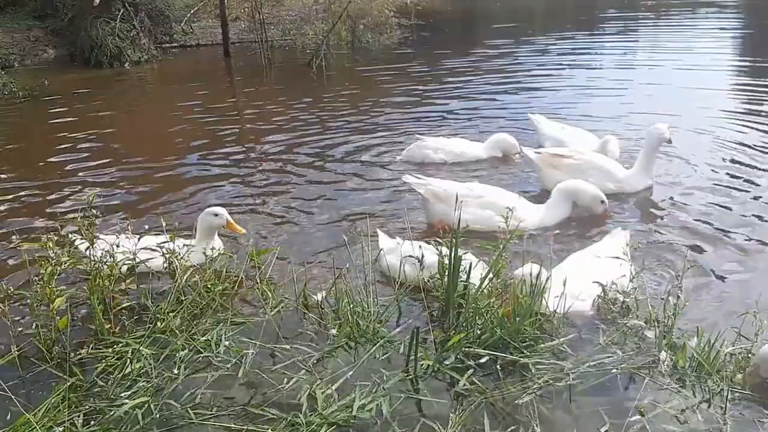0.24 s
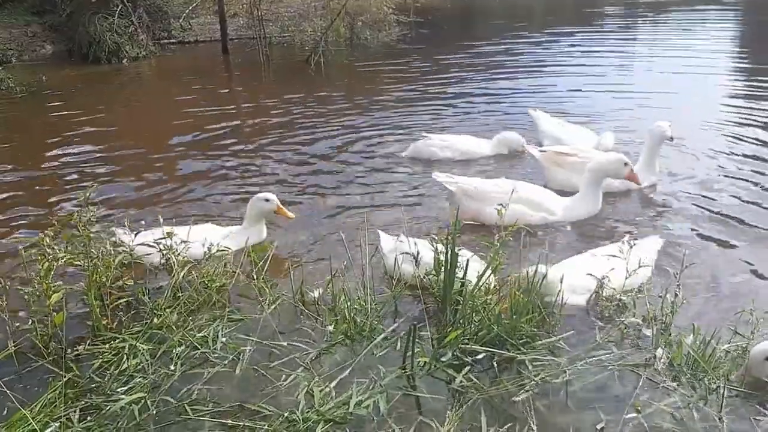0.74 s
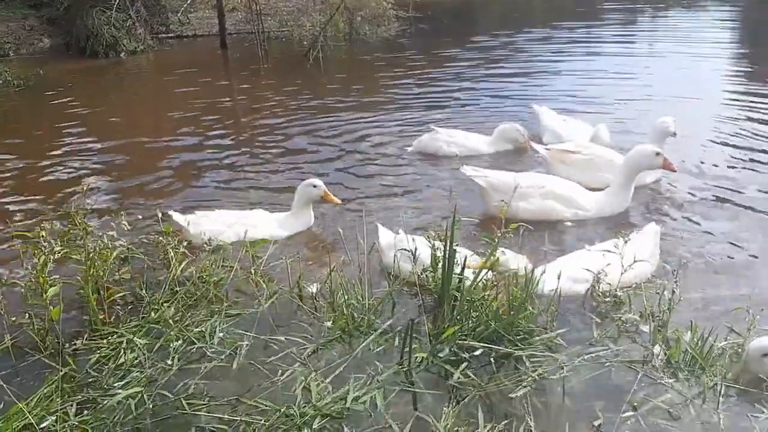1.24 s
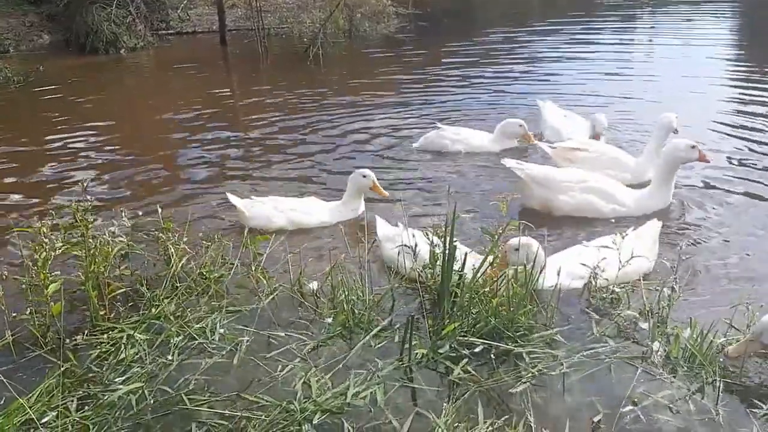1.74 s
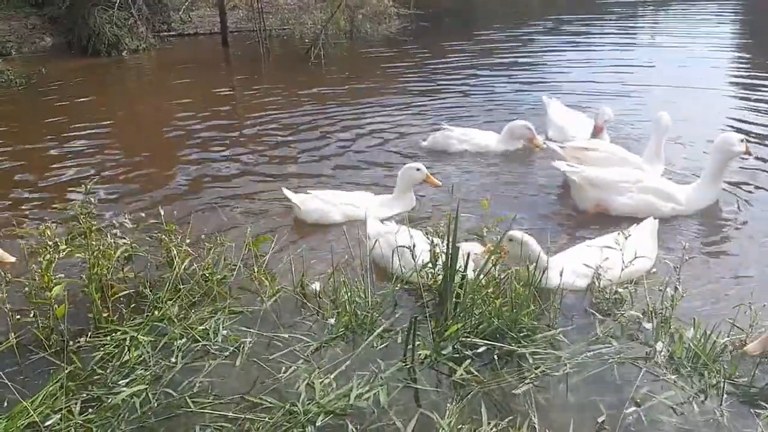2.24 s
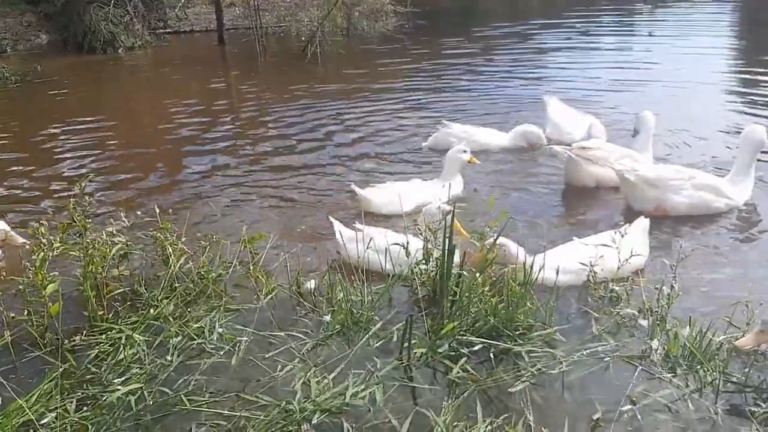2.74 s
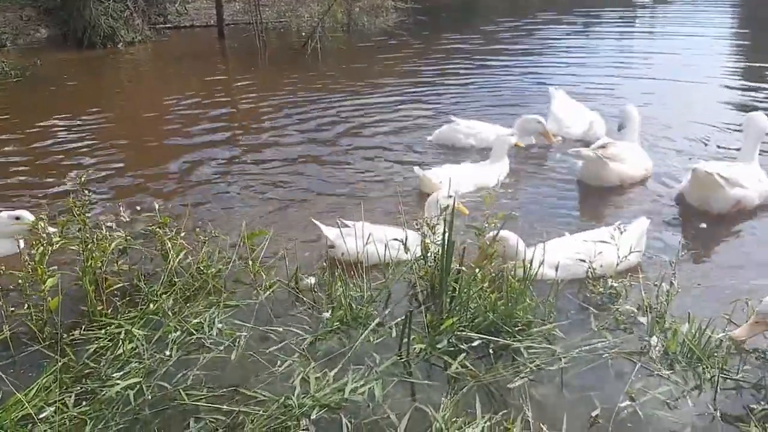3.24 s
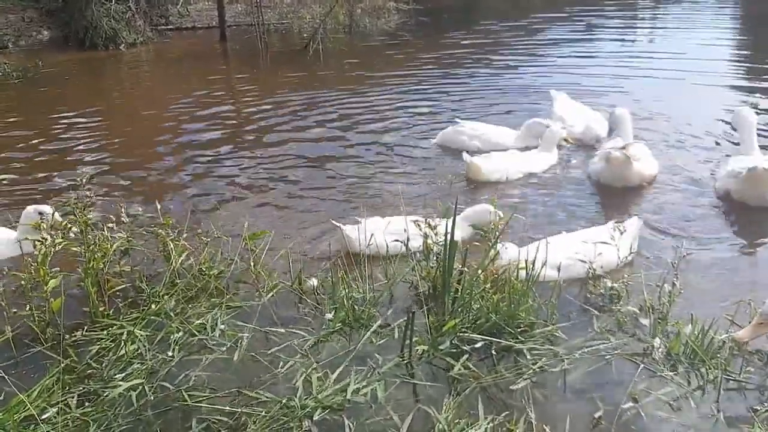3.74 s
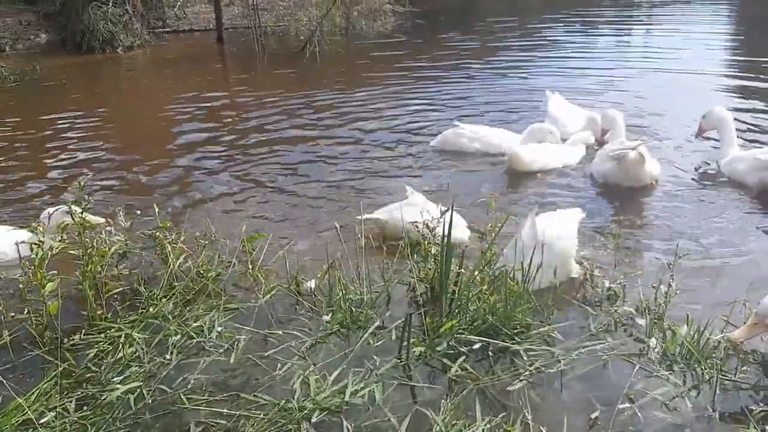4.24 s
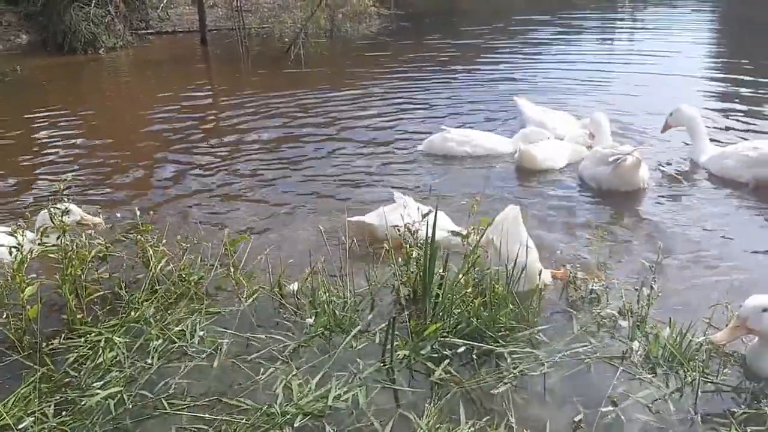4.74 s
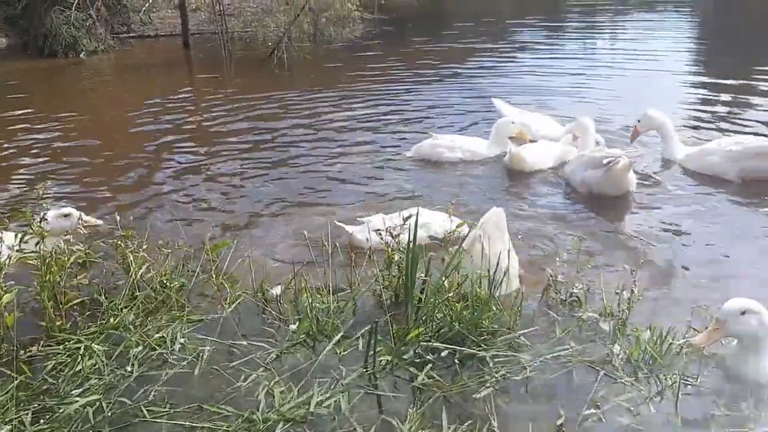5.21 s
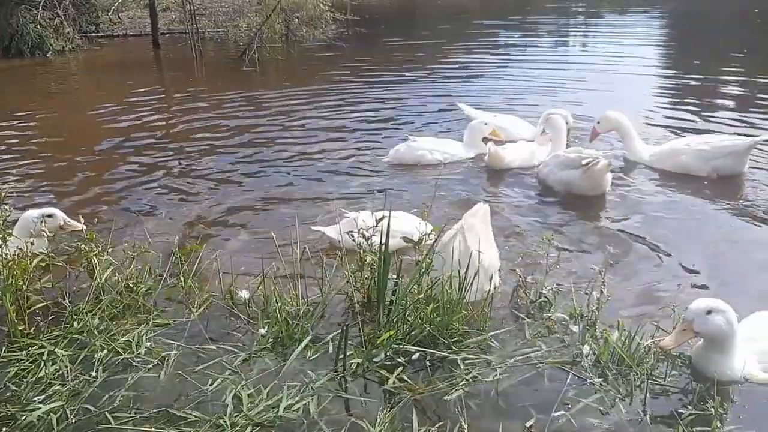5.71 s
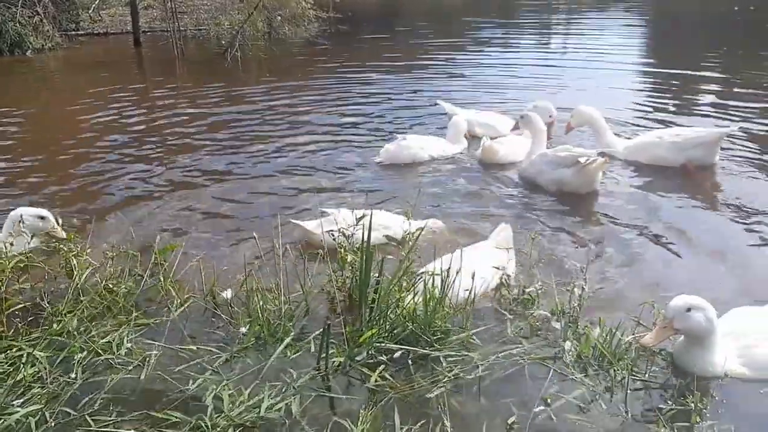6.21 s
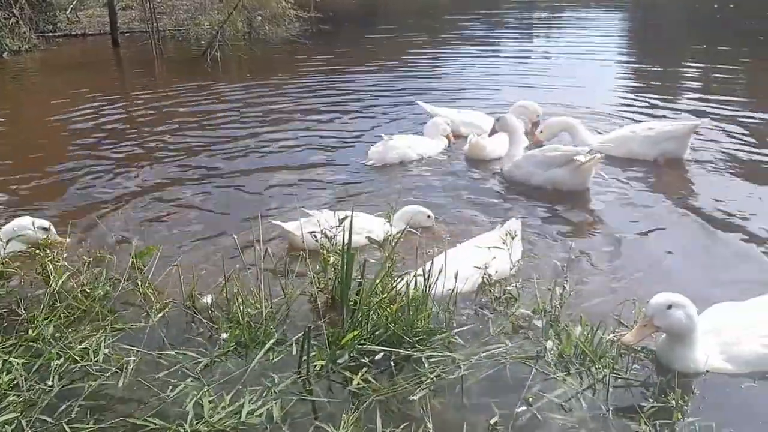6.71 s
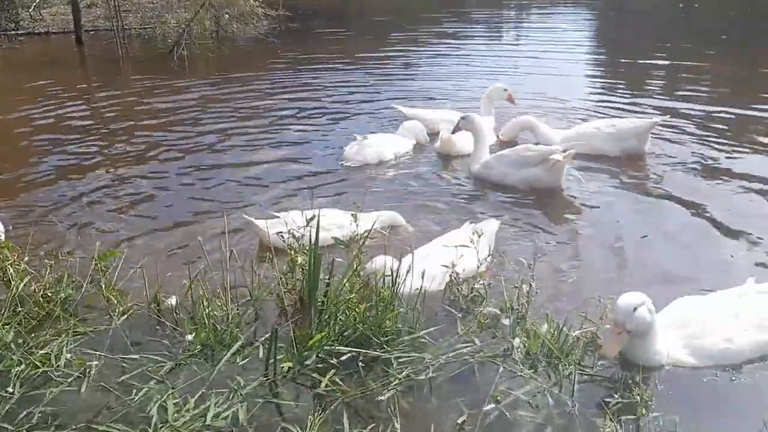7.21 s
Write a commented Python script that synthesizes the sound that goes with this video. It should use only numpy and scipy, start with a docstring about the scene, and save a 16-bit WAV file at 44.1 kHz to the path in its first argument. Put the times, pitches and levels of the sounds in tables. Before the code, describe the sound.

Several white ducks and geese feed a few metres away in a shallow pond. Gurgling water and sharp drips open with a quick goose honk, then calm. A busy burst of grunts, plops and splashing follows in the middle, then thin drips and soft duck rasps, then crisp splashes and bill clacks before it settles. Faint insects buzz throughout; small stereo outdoor microphone, little echo.

```python
"""Ducks and geese at a shallow pond

Ducks and geese dabble a few metres from a small camera with two microphone ports. Goose grunts are uneven
pulses; duck rasps and two watery splashes are chopped air, both through throat resonances. Peeps, plops and one
far whistle are gliding sines; drops ring briefly; spray is hiss with tiny bubbles. Insects buzz, trill and
chirp as throbbing narrow tones and noise, over a faint rumble of shaped noise."""
import sys
import numpy as np
from scipy import signal
from scipy.fft import rfft, irfft, next_fast_len
from scipy.io import wavfile
from scipy.ndimage import uniform_filter1d

SR = 44100
rng = np.random.default_rng(int(sys.argv[2]) if len(sys.argv) > 2 else 0)


def materialize(psi):
    """Save the field psi as 16-bit PCM at rate SR to the path in sys.argv[1].

    A 1-D psi becomes a single channel; in a 2-D psi each row is a channel.
    """
    bounded = np.clip(np.atleast_2d(psi).T, -1, 1)
    quanta = np.round(bounded * 32767).astype(np.int16)
    wavfile.write(sys.argv[1], SR, quanta)


N = 328986


def gain_of(db):
    """Amplitude factor of a level in dB."""
    return 10 ** (np.asarray(db) / 20)


def evened(x):
    """Scale to rms 1."""
    return x / np.sqrt(np.mean(x ** 2) + 1e-20)


def peaked(x, db):
    """Scale to a peak in dB."""
    return gain_of(db) * x / abs(x).max()


def read(points, hz):
    """Read a curve of (Hz, value) points along log frequency."""
    f, value = np.transpose(points)
    return np.interp(np.log(hz + 1), np.log(f + 1), value)


def over_time(points):
    """Read a curve of (seconds, value) points at every sample."""
    return np.interp(np.arange(N) / SR, *np.transpose(points))


def add(mix, s, sound):
    """Lay a sound into the mix at s seconds."""
    part = mix[..., round(s * SR):][..., :sound.shape[-1]]
    part += sound[..., :part.shape[-1]]


def ring(x, hz, width):
    """Two-pole resonance of gain 1."""
    return signal.lfilter(*signal.iirpeak(hz, hz / width, SR), x)


def throat(drive, resonances, level_db):
    """Parallel resonances, each a narrow and a wide one in a row; level_db(Hz) adds to their own levels."""
    out = 0
    for f, width, db in resonances:
        out = out + gain_of(db + level_db(f)) * ring(ring(drive, f, width), f, 3 * width)
    return out


def swell(length, peak):
    """Smooth rise to the given share of the length, then a smooth fall."""
    u = np.linspace(0, 1, round(length * SR))
    peak = np.clip(peak, .02, .98)
    return np.sin(np.pi / 2 * np.minimum(u / peak, (1 - u) / (1 - peak))) ** 0.56


def drift(per_s):
    """Random wander of rms 1 with per_s new values a second."""
    return evened(np.interp(np.arange(N) * per_s / SR, np.arange(N // 50), rng.standard_normal(N // 50)))


# How alike the left and right ports hear diffuse noise.
# Each row: frequency in Hz, likeness from -1 to 1.
PORT_LIKENESS = [(60, 0.61), (180, 0.83), (550, -0.24), (1650, -0.11), (4970, 0.16), (15000, -0.042)]


def hiss(spectrum, patchy_db):
    """Random short-time spectra of rms 1 with drifting patches, partly shared between the ports."""
    hz = np.fft.rfftfreq(512, 1 / SR)
    a, b, c, d, patches = rng.standard_normal((N // 128 + 5, 257, 5)).T
    patches = evened(uniform_filter1d(uniform_filter1d(patches, 6, 0), 16, 1))
    same = np.clip(read(PORT_LIKENESS, hz), -1, 1)[:, None]
    left = a + 1j * b
    right = same * left + np.sqrt(1 - same ** 2) * (c + 1j * d)
    patch_depth = patchy_db * (hz / (hz + 300))[:, None]  # the bass is steadier
    z = np.array([left, right]) * gain_of(read(spectrum, hz)[:, None] + patch_depth * patches)
    return evened(signal.istft(z, nperseg=512, noverlap=384)[1][:, :N])


# Spectrum of the air around the pond, strongest in the low rumble.
# Each row: frequency in Hz, relative level in dB.
AIR_SPECTRUM = [(24, -35), (40, 27), (117, -1), (464, -13.5), (747, -5.5), (1010, -9), (2540, -17),
                (4520, -8.5), (5260, -3.5), (7600, -15), (8670, -19), (10600, -48), (15800, -6.5)]
AIR_DB = -58.5  # rms level


def air():
    """A faint rumble and hiss: random noise given a fixed average spectrum."""
    return gain_of(AIR_DB) * hiss(AIR_SPECTRUM, patchy_db=5.5)


# Insects around the pond.
# Each row: pitch in Hz, width in Hz, level in dB, throbs per second, throb sharpness, time of joining in seconds.
INSECT_VOICES = [(5293, 380, -64, 66.8, 1.05, -9), (8640, 330, -70, 14, 0.3, -9),
                 (7995, 400, -68.5, 18.5, 0.78, 4)]


def insects():
    """A wavering tone, partly noise, that throbs at a nearly steady rate and falls in pitch through each throb."""
    out, t = np.zeros((2, N)), np.arange(N) / SR
    for hz, width, db, per_s, depth, joins in INSECT_VOICES:
        beat = 2 * np.pi * np.cumsum(per_s * (1 + 0.0118 * drift(1.52))) / SR
        throb = np.exp(depth * (np.sin(beat) + 0.3 * np.sin(2 * beat)))
        buzz = evened(ring(ring(rng.standard_normal((2, N)), hz, width), hz, 2 * width))
        # each port's tone wavers on its own
        pitch = [hz + width * (0.51 * depth * np.cos(beat) + 0.2 * drift(150) / depth) for port in range(2)]
        tone = np.sin(2 * np.pi * np.cumsum(pitch, axis=1) / SR)
        level = gain_of(db + 1.7 * drift(1.26)) * np.clip((t - joins) / .3, 0, 1)
        out += level * evened((0.1 / depth ** 2 * buzz + tone) * throb)
    return out


CHIRP_HZ, CHIRP_WIDTH_HZ, CHIRP_DB, CHIRP_SHARP = 9230, 410, -73, 2.3
CHIRPS_PER_S, QUICKEN, CHIRP_LAG = 2.45, .065, .66  # starting rate, its gain each second, offset in chirps


def chirper():
    """One insect's slow chirps: short puffs of narrow noise, a little faster each second."""
    t = np.arange(N) / SR
    turns = CHIRPS_PER_S * t + QUICKEN * t ** 2 / 2 - CHIRP_LAG
    puffs = np.exp(CHIRP_SHARP * np.cos(2 * np.pi * turns))
    noise = rng.standard_normal((2, N))
    buzz = ring(ring(noise, CHIRP_HZ, CHIRP_WIDTH_HZ), CHIRP_HZ, CHIRP_WIDTH_HZ)
    return gain_of(CHIRP_DB) * evened(buzz * puffs)


def grains(hz, per_s, cycles, spread_db):
    """Sparse tiny bubbles, rms 1: decaying sines that rise in pitch, each pitch from its own side; a few are large."""
    out = np.zeros((2, N))
    for f in hz:
        t = np.arange(round(4 * cycles / f * SR) + 8) / SR
        envelope = np.exp(-t * f / cycles) * (1 - np.exp(-t * f))
        grain = np.sin(2 * np.pi * f * t * (1 + 0.004 * f * t)) * envelope
        chance, size = rng.random((2, N))
        sizes = gain_of(spread_db * np.minimum(-np.log(size + 1e-9), 4))
        train = (chance < per_s / len(hz) / SR) * sizes
        lag = rng.integers(0, 7)  # samples by which the left port hears it later
        sound = evened(signal.oaconvolve(train, grain)[:N])
        out += [np.roll(sound, lag), sound]
    return evened(out)


# Favoured bubble sizes in the shallows.
# Each row: centre pitch in Hz, relative level in dB.
BUBBLE_SIZES = [(701, -8.5), (1195, -11.5), (1860, -11), (353.4, -16.5)]
# How strongly the water gurgles.
# Each row: time in seconds, drive in dB before the bubble levels.
GURGLE_DRIVE = [(0, -57), (.9, -58), (1.3, -65), (2.1, -66.5), (2.47, -57), (3, -57.5), (3.3, -64),
                (4.8, -66.5), (5.5, -62), (6.15, -81), (6.65, -65.5), (7, -72.5), (7.46, -71)]


def gurgle():
    """A babble of small bubbles around a few favoured pitches."""
    bubbles = np.zeros((2, N))
    for hz, db in BUBBLE_SIZES:
        bubbles += gain_of(db) * grains(hz * np.linspace(.85, 1.15, 3), per_s=98, cycles=7.7, spread_db=3.5)
    return gain_of(over_time(GURGLE_DRIVE)) * bubbles


# Spectrum of the spray's hiss.
# Each row: frequency in Hz, relative level in dB.
SPRAY_SPECTRUM = [(1500, -13), (2600, -4), (3300, -2), (4500, -2.5), (7000, -2.5), (7800, -10), (11000, -4),
                  (15500, -2)]
# How hard feet and bills stir the pond.
# Each row: time in seconds, drive of the spray in dB.
STIRRING = [(0, -56), (1.202, -64), (1.6, -58.5), (2.598, -55), (2.999, -49), (3.151, -56), (3.7, -57),
            (4.95, -70.5), (5.7, -56.5), (6.498, -61.5), (6.698, -64.5), (7.46, -61)]
# Sheets of water thrown up near the birds.
# Each row: start in seconds, nominal length in seconds (the swell lasts 1.5 times it), drive in dB.
WATER_SHEETS = [(0.431, 0.035, -56), (1.585, 0.022, -53), (1.9, 0.082, -53), (2.283, 0.024, -47.5),
                (2.455, 0.031, -45), (2.627, 0.025, -50.5), (2.829, 0.05, -56), (2.992, 0.072, -48.5),
                (3.472, 0.081, -62.5), (4.643, 0.047, -58.5), (5.383, 0.033, -47), (5.657, 0.02, -53),
                (5.752, 0.044, -46), (5.839, 0.032, -47), (6.024, 0.012, -46.5), (6.135, 0.04, -53),
                (6.27, 0.0059, -44.5), (6.42, 0.03, -52), (6.464, 0.06, -53.5)]


def spray():
    """Fine hiss with tiny drops in it; it crackles where a sheet of water breaks up."""
    sheets = np.zeros(N)
    for s, length, db in WATER_SHEETS:
        add(sheets, s, gain_of(db) * swell(1.5 * length, 0.12) ** 2.4)
    stirred = gain_of(over_time(STIRRING) + 2.64 * drift(90))
    crackle = evened(gain_of(3.6 * drift(260)))
    drops = grains(np.geomspace(3200, 14500, 14), per_s=3500, cycles=11.3, spread_db=4.5)
    fizz = 1.106 * hiss(SPRAY_SPECTRUM, patchy_db=4.0) + 0.59 * drops
    return (stirred + sheets * crackle) * fizz


# The loudest drops and bill clacks, close to the camera.
# Each row: start in seconds, peak in dB, ringing pitch in Hz.
DROPS_AND_CLACKS = [(0.0448, -34.5, 4400), (0.1274, -21, 4900), (0.3646, -25, 14100), (.5327, -39.5, 3550),
                    (0.697, -34, 4700), (0.7255, -41, 2080), (1.5916, -35.5, 3240), (1.6205, -34, 5510),
                    (1.6926, -38.5, 4760), (1.93, -35, 13300), (2.088, -36.5, 3550), (2.1999, -33, 5000),
                    (2.4593, -38, 6400), (2.552, -39, 3370), (2.6187, -38, 3300), (2.6353, -36.5, 3920),
                    (2.656, -36.5, 3160), (2.6657, -39.5, 3250), (2.7177, -38.5, 3540), (2.724, -36, 3430),
                    (2.8165, -40.5, 3370), (2.8434, -38, 3180), (2.9358, -33.5, 3230),
                    (3.3298, -33.5, 5090), (3.8651, -25.5, 5170), (3.923, -36, 2930), (3.9252, -43, 1370),
                    (3.9818, -40.5, 3600), (3.988, -40, 7300), (4.11, -34.5, 5420), (4.461, -43, 5960),
                    (4.649, -42.5, 3480), (4.6576, -41, 2920), (4.663, -47, 2370), (4.758, -46, 3230),
                    (4.993, -39, 1970), (5.197, -36.5, 1750), (5.3996, -24, 14200), (5.6565, -37.5, 2095),
                    (5.674, -33.5, 10900), (5.731, -37, 11600), (5.759, -30, 3170), (5.7588, -29, 11100),
                    (5.762, -29, 11200), (5.801, -42, 9500), (5.8002, -40, 3640), (5.8334, -36, 6500),
                    (5.839, -36, 11400), (5.8434, -28, 10600), (5.85, -34, 3470), (5.8502, -22.5, 10750),
                    (5.8583, -27, 11600), (5.8644, -36, 3670), (5.9503, -37, 9950), (6.0255, -34.5, 11100),
                    (6.031, -38, 9150), (6.0799, -40, 3100), (6.2677, -49, 4800), (6.318, -36, 10060),
                    (6.325, -49.5, 2490), (6.4063, -26, 3320), (6.4433, -30, 2210), (6.4704, -21, 4780),
                    (6.5513, -26.5, 13300), (6.602, -47, 3240), (6.865, -42, 3480), (7.2205, -38.5, 4130),
                    (7.3527, -30.5, 5150)]


def tick(db, hz):
    """A faint crack, a tiny bubble that swells and rings unevenly for a few cycles, and a patter of smaller drops."""
    t = np.arange(1500) / SR
    crack, patter, shake = rng.standard_normal((3, 1500))
    crack = np.diff(crack, prepend=0) * np.exp(-t / .0006)
    patter = patter ** 3 / 3 * np.exp(-t / 0.045)  # cubing leaves sparse spikes
    cycles = t * hz
    rise = .97 + .003 * np.minimum(cycles, 20)  # the pitch climbs at first
    uneven = 1.5 * evened(ring(shake, hz, hz / 10))
    ringing = (np.sin(2 * np.pi * cycles * rise) + uneven) * cycles ** 0.46 * np.exp(-cycles / 5.4)
    return peaked(ringing / abs(ringing).max() + 0.022 * crack + 0.019 * patter, db)


# Peeps, bubbles under the bills and one far bird's whistle, all near sines.
# Each row: start in seconds, length in seconds, nominal peak in dB, first pitch in Hz, last pitch in Hz.
PEEPS_AND_PLOPS = [(.458, 0.029, -32, 829, 714), (.474, 0.014, -34, 900, 960),
                   (.488, 0.0037, -35.5, 1240, 1440), (.605, 0.05, -52.5, 753, 564),
                   (.965, 0.036, -45.5, 397, 457), (1.555, 0.013, -50, 1100, 2320),
                   (1.566, 0.023, -47.5, 310, 480), (1.581, 0.023, -41, 480, 632),
                   (2.25, 0.018, -56, 1290, 1140), (2.31, 0.027, -44, 997, 600),
                   (2.362, 0.022, -37, 560, 870), (2.391, 0.0097, -41.5, 870, 940),
                   (2.5, 0.045, -55.5, 1910, 1300), (2.558, 0.013, -46, 2120, 2870),
                   (2.574, 0.0048, -27.5, 2000, 1720), (2.585, 0.019, -50, 764, 1060),
                   (2.598, 0.04, -63, 1675, 1800), (2.618, 0.015, -42, 980, 543),
                   (2.69, 0.045, -52, 1353, 1780), (2.73, 0.0253, -44.5, 1734, 1080),
                   (2.751, 0.013, -35.5, 840, 790), (2.805, 0.016, -50, 770, 517),
                   (2.939, 0.0048, -44.5, 1600, 1590), (2.959, 0.026, -56, 630, 790),
                   (3.087, 0.029, -47.5, 1650, 1050), (3.111, 0.03, -30, 855, 769),
                   (3.5, 0.029, -55, 1135, 1360), (3.704, 0.029, -41.5, 842, 597),
                   (3.855, 0.052, -57.5, 786, 716), (3.994, 0.18, -62.5, 3580, 3680),
                   (4.175, 0.058, -58.5, 1150, 656), (4.398, 0.047, -50.5, 1223, 1139),
                   (4.435, 0.033, -59, 852, 560), (4.765, 0.031, -59.5, 787, 727),
                   (4.787, 0.049, -55.5, 637, 693), (5.154, 0.0055, -46.5, 1670, 2130),
                   (5.172, 0.0058, -34, 2020, 1800), (5.197, 0.0078, -36.5, 880, 890),
                   (5.219, 0.035, -49.5, 507, 1094), (5.365, 0.044, -50.5, 447, 410),
                   (5.865, 0.022, -59, 1970, 1980), (6.472, 0.042, -54.5, 1215, 1515),
                   (6.5, 0.097, -59, 813, 636), (6.607, 0.0062, -48, 650, 950),
                   (6.632, 0.015, -59, 750, 760), (6.652, 0.0094, -69, 796, 820),
                   (6.671, 0.011, -39.5, 697, 860), (6.713, 0.017, -59.5, 685, 766),
                   (6.735, 0.0093, -57, 780, 840), (6.763, 0.0098, -46.5, 706, 795),
                   (6.799, 0.02, -48.5, 780, 816)]
PEEP_PEAK, PEEP_ARCH = 0.74, 0.028  # peak's place 0-1 in long ones; share by which the pitch bows up mid-way


def peep(length, db, first_hz, last_hz):
    """A gliding sine; loud ones are steady with overtones, soft ones shake, short ones start abruptly."""
    shape = swell(length, PEEP_PEAK * min(length / 0.039, 1)) ** 0.79
    rough = np.clip(-(db + 28) / 25, .1, 1)
    noise = rng.standard_normal((2, 10000))
    shake, flutter = uniform_filter1d(noise, 130)[:, :len(shape)] * np.sqrt(130) * rough
    bow = 1 + PEEP_ARCH * np.sin(np.linspace(0, np.pi, len(shape))) + 18 * shake / first_hz + 0.0047 * shake
    phase = 2 * np.pi * np.cumsum(bow * np.geomspace(first_hz, last_hz, len(shape))) / SR
    shape = shape * gain_of(3.4 * flutter)
    overtones = np.sin(2 * phase) + .3 * np.sin(3 * phase)
    richness = gain_of(db + 15) * min(length / .03, 1) ** 2 * shape
    return gain_of(db) * shape * (np.sin(phase) + richness * overtones)


# Hoarse, breathy duck calls a few metres off, and two watery splashes (near 0.11 s and 6.45 s) made the same
# way. Each row: start in seconds, length in seconds, level in dB, treble tilt in dB per octave.
RASPY_BURSTS = [(.113, 0.027, -56.5, -1.5), (.599, 0.077, -60, -19), (1.153, 0.071, -60.5, -15),
                (3.662, .12, -51.5, -7.5), (3.918, 0.11, -59, -14.5), (4.134, 0.1, -58, -14.5),
                (4.39, 0.1, -64.5, -17), (4.69, 0.047, -57, -6), (5.562, 0.068, -57.5, 1),
                (5.65, 0.064, -51, -2), (6.445, 0.056, -52, 6), (6.771, 0.17, -65, -12.5),
                (7.16, 0.051, -67, -23)]
# Resonances of the duck's throat.
# Each row: frequency in Hz, width in Hz, relative level in dB.
DUCK_THROAT = [(706, 165, -1), (1231, 90, 9.5), (1942, 145, 13.5), (2910, 300, 3)]
FLAPS_PER_S = 85


def rasp(length, db, tilt_db):
    """Slack folds flap unevenly and chop the air, through the duck's throat; the same chopped sound also gives
    two watery splashes."""
    shape = swell(length, 0.19)
    air_noise, flap = rng.standard_normal((2, 8000))[:, :len(shape)]
    flap = evened(uniform_filter1d(flap, 220))
    turns = np.cumsum(FLAPS_PER_S * (1 + 0.2 * flap)) / SR + .7
    pulses = np.diff(np.floor(turns), prepend=0)
    chopped = air_noise * (.3 + 2 * np.exp(-(turns % 1) / .3))
    drive = (chopped + 0.6 * evened(pulses)) * gain_of(3.0 * flap) * shape
    voice = throat(np.pad(drive, (0, 400)), DUCK_THROAT, lambda f: tilt_db * np.log2(f / 1000))
    # all pitches arch as the bill opens: the voice is read at a varying speed
    arch = np.cos(np.linspace(-np.pi / 2, np.pi / 2, len(voice)))
    place = np.cumsum(1 + 0.15 * arch - .1)
    return gain_of(db) * evened(np.interp(place, np.arange(len(voice)), voice))


# Pulsed goose calls a few metres off.
# Each row: start in seconds, length in seconds, effort (peak) in dB, gain of the open bill above 500 Hz in dB.
GOOSE_GRUNTS = [(.326, 0.066, -43.5, -1), (.408, 0.027, -40.5, -24), (.474, 0.018, -21, 0),
                (.873, .089, -45, -14), (1.486, 0.085, -48, -23), (2.142, 0.058, -44.5, -25),
                (2.208, 0.048, -40, -31), (2.275, 0.046, -20.5, -6), (2.469, 0.02, -41, -5),
                (2.571, 0.017, -22, 3.5), (2.685, 0.014, -33.5, 2), (2.739, 0.013, -29.5, 3.5),
                (2.76, 0.027, -28.5, -5), (2.838, 0.054, -41, -30), (2.925, 0.023, -38, -39),
                (3.065, 0.0085, -37, -11), (3.127, 0.064, -20, 0), (3.287, 0.03, -28, -1.5),
                (3.484, 0.0097, -31.5, 4.5), (5.555, 0.068, -36.5, -2), (5.633, 0.045, -37.5, -8)]
# Resonances of the goose's throat.
# Each row: frequency in Hz, width in Hz, relative level in dB.
GOOSE_THROAT = [(152, 72, 12), (269, 256, 13.5), (455, 390, -25), (667, 310, 7.5), (894, 58, -9),
                (1200, 220, -1), (1820, 100, 3), (3380, 1040, 4)]
# a grunt of effort SOFT_DB holds SOFT_HZ; more effort starts higher and sags, less starts lower and climbs
SOFT_DB, SOFT_HZ, HZ_PER_DB, SAG_OCT_PER_S = -43, 143.7, 4.0, 9.0


def grunt(length, db, open_db):
    """Uneven pulses, breathier when soft, through the throat; an open bill lets the upper resonances out."""
    shape = swell(length, 0.29 * min(length / 0.031, 1)) ** 2.24
    first_hz = SOFT_HZ + HZ_PER_DB * (db - SOFT_DB)
    last_hz = first_hz / 2 ** (SAG_OCT_PER_S * length * (first_hz / SOFT_HZ - 1))
    wobble, puffs, strength = rng.standard_normal((3, 4000))[:, :len(shape)]
    wobble = 1 + 0.14 * evened(uniform_filter1d(wobble, 150))
    turns = np.cumsum(np.linspace(first_hz, last_hz, len(shape)) * wobble) / SR
    pulses = np.diff(np.floor(turns + 0.8), prepend=0) * gain_of(1.5 * strength)
    breath = gain_of(-1 - .22 * (db + 20)) * puffs * np.exp(-(turns % 1) / 0.7)
    drive = np.pad((evened(pulses) + breath) * shape, (0, 600))
    drive = signal.sosfilt(signal.butter(2, [110, 1500], "band", fs=SR, output="sos"), drive)
    return peaked(throat(drive, GOOSE_THROAT, lambda f: open_db * (f > 500)), db)


# Near sounds favour one port or the other, by pitch.
# Each row: frequency in Hz, left minus right in dB.
PORT_LEAN = [(600, -.5), (1200, -3), (2500, 5.5), (4500, 7.5), (9000, 16), (14000, -5)]


def stereo(x, lag_us):
    """A source off to one side reaches the left port later; the camera body shades each port."""
    size = next_fast_len(N)
    hz, z = np.fft.rfftfreq(size, 1 / SR), rfft(x, size)
    lean = gain_of(read(PORT_LEAN, hz) / 2)
    left = z * lean * np.exp(-2j * np.pi * hz * lag_us / 10 ** 6)
    return irfft(np.array([left, z / lean]), size)[:, :N]


# How long the reeds and banks around the pond echo.
# Each row: frequency in Hz, time to fall 60 dB in seconds.
BANK_DECAY = [(300, 0.058), (2000, 0.15), (10000, 0.02)]


def banks(x):
    """Sparse echoes of random sign, each band dying at its own speed."""
    taps = np.zeros((2, 12000))
    at = np.arange(200, 11980, 20) + rng.integers(0, 20, (2, 589))
    np.put_along_axis(taps, at, rng.choice([-1., 1.], at.shape), 1)
    hz, t, z = signal.stft(taps, SR, nperseg=256)
    z[1] += (z[0] - z[1]) / (1 + (hz[:, None] / 900) ** 2)  # low echoes reach both ports alike
    decay = gain_of(-60 * t / read(BANK_DECAY, hz)[:, None])
    tail = signal.istft(z * decay, SR, nperseg=256)[1]
    return signal.fftconvolve(x, tail / np.linalg.norm(tail[0]), axes=1)[:, :N]


def scene():
    """Birds and drops near the camera with their echoes, over water, insects and air."""
    calls, drops = np.zeros((2, N))
    for s, *row in DROPS_AND_CLACKS:
        add(drops, s, tick(*row))
    for table, voice in ((PEEPS_AND_PLOPS, peep), (RASPY_BURSTS, rasp), (GOOSE_GRUNTS, grunt)):
        for s, *row in table:
            add(calls, s, voice(*row))
    calls, drops = stereo(calls, lag_us=66), stereo(drops, lag_us=89)
    echoes = banks(gain_of(-13.0) * calls + gain_of(-13.5) * drops)
    background = air() + insects() + chirper()
    return background + gurgle() + spray() + drops + calls + echoes


EDGE_HZ = 15850  # upper band limit


def record(dry):
    """The small microphones lose the deep bass; then a steep filter limits the band."""
    thin = signal.sosfilt(signal.butter(2, 90, "high", fs=SR, output="sos"), dry)
    low_pass = signal.firwin(511, EDGE_HZ, window=("kaiser", 9), fs=SR)
    return signal.oaconvolve(thin, low_pass[None], "same")


dry = scene()
out = record(dry)
materialize(out)
```